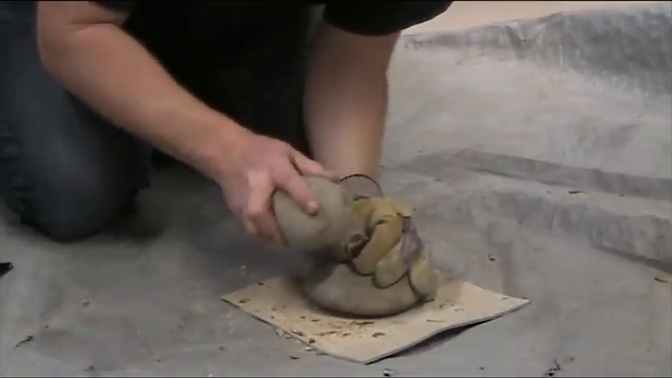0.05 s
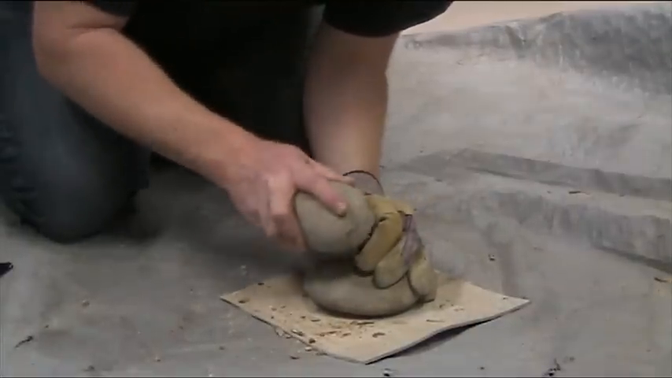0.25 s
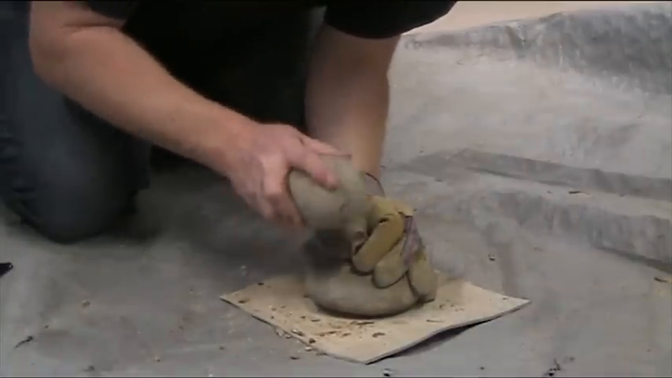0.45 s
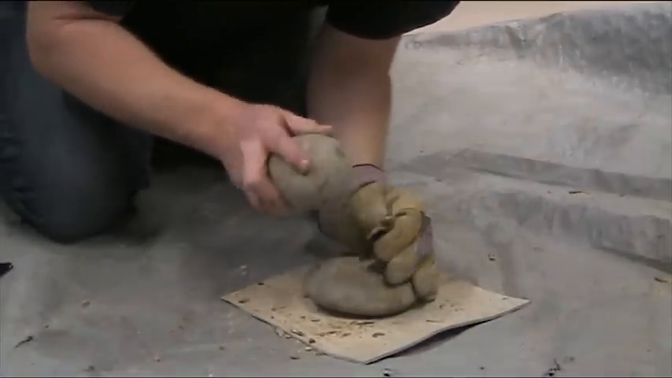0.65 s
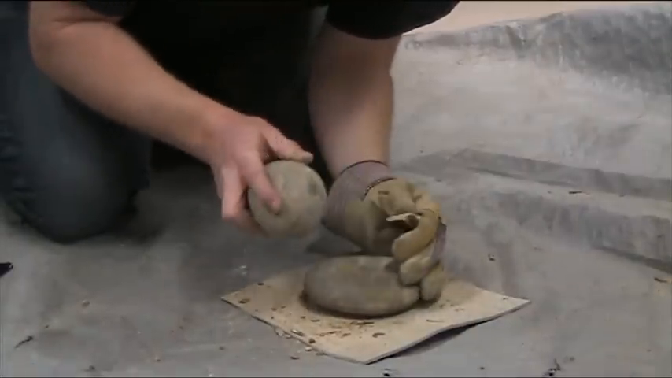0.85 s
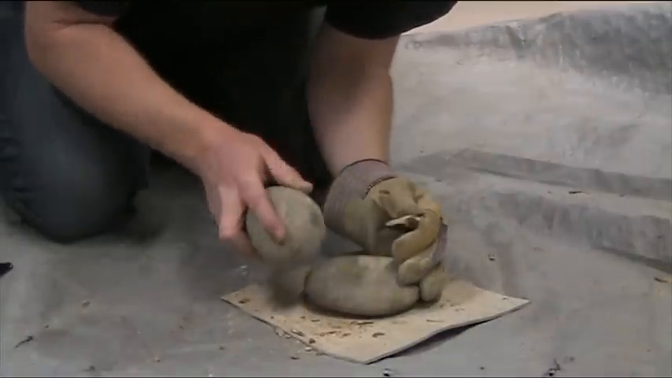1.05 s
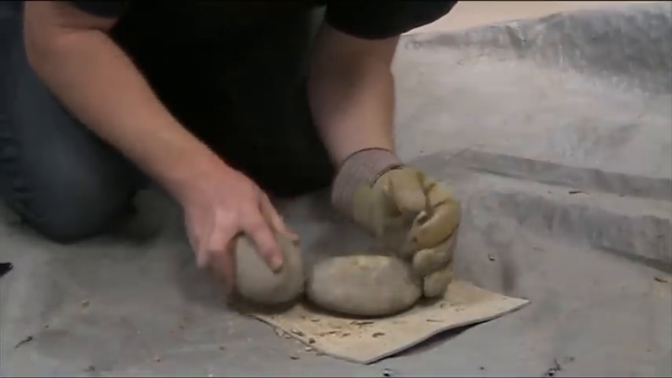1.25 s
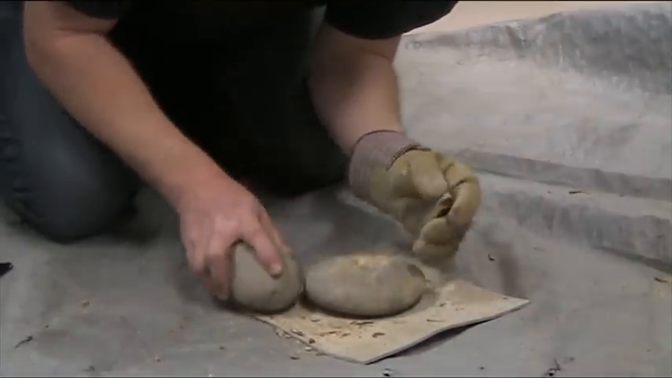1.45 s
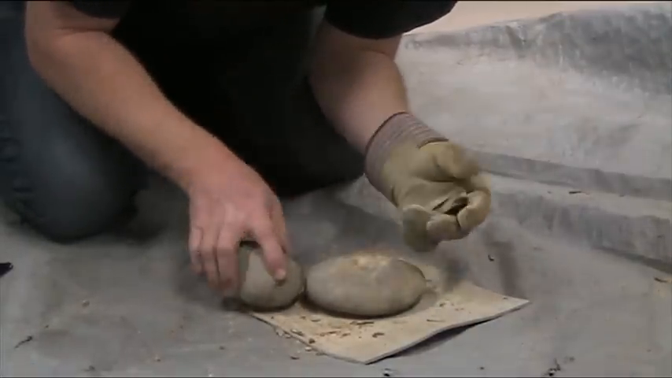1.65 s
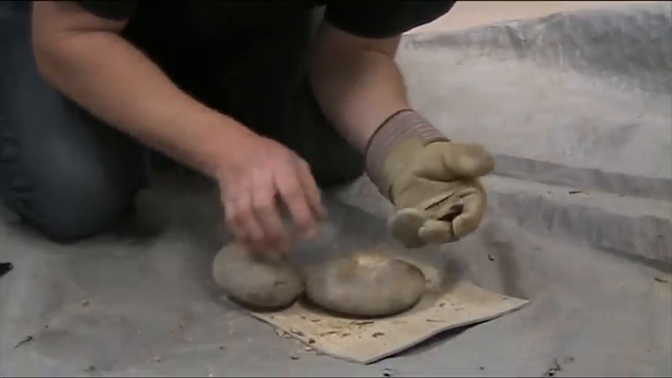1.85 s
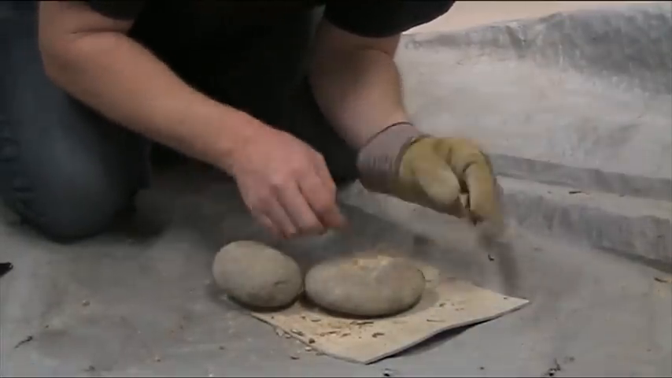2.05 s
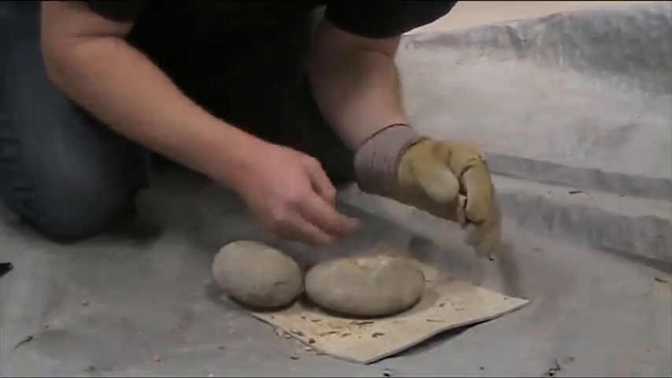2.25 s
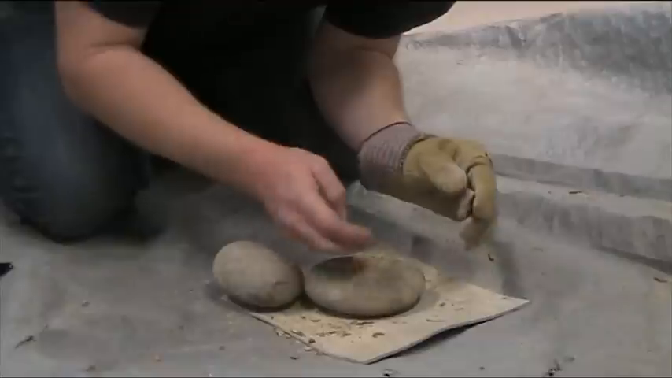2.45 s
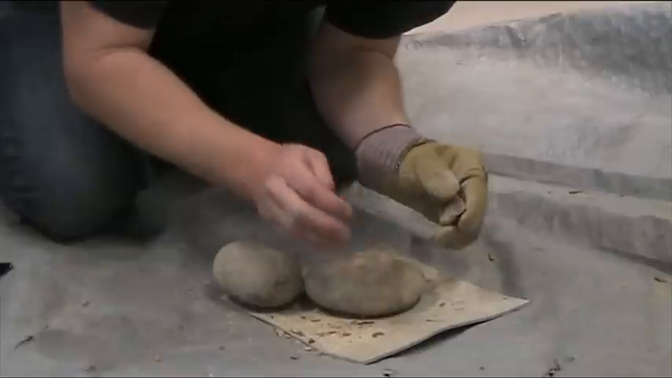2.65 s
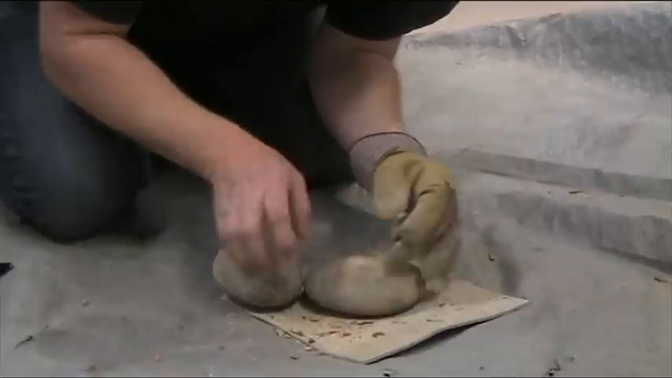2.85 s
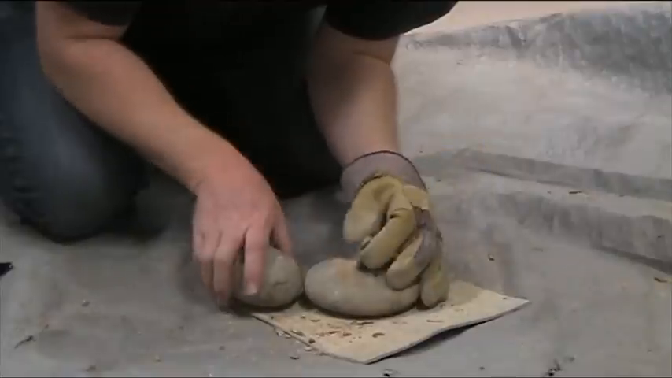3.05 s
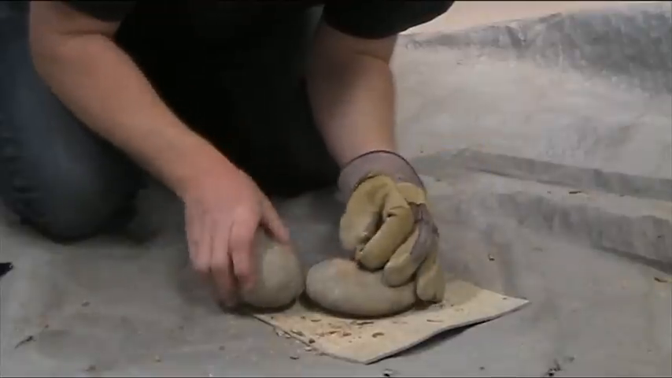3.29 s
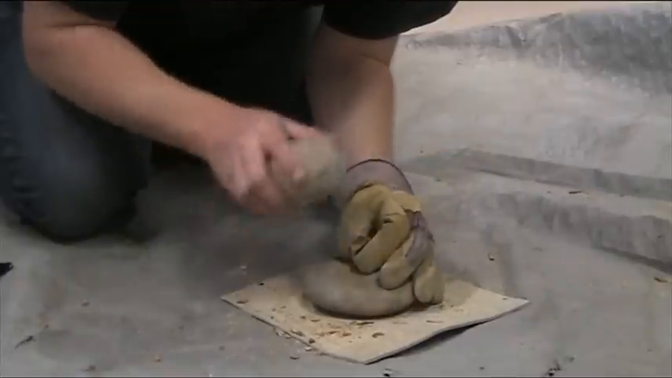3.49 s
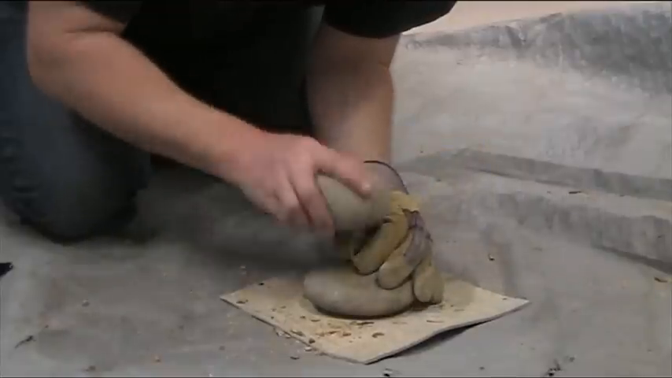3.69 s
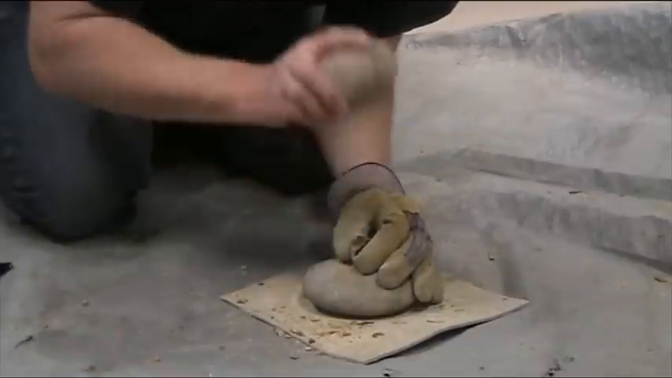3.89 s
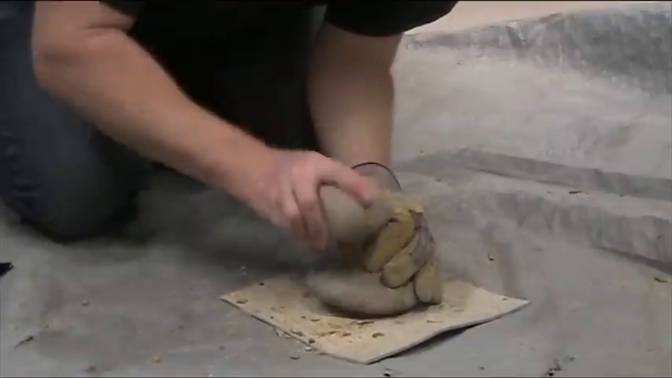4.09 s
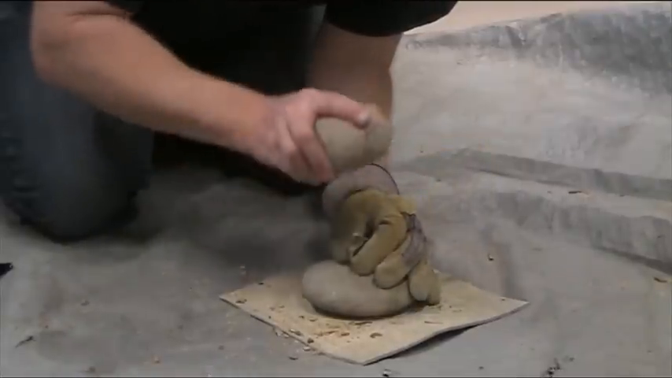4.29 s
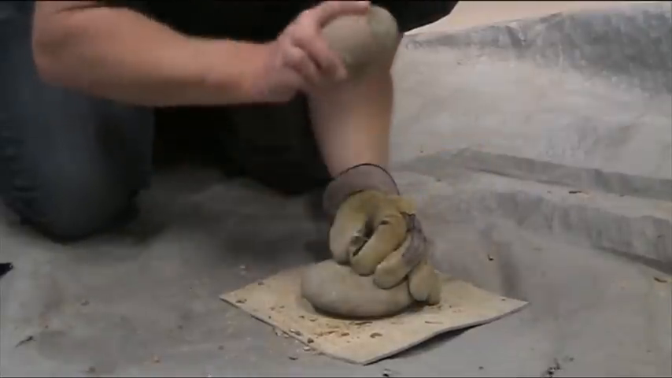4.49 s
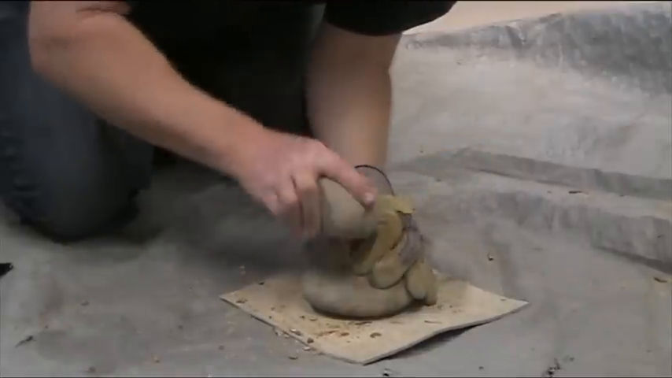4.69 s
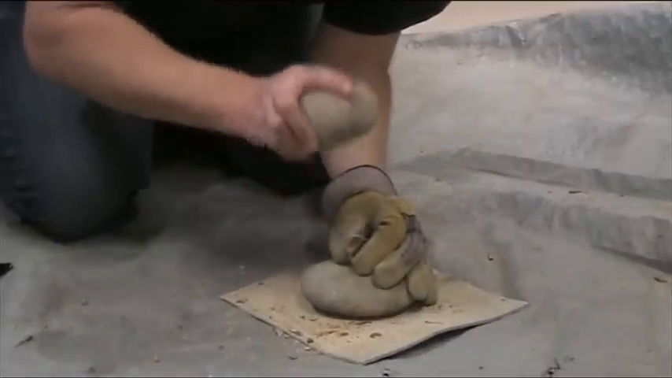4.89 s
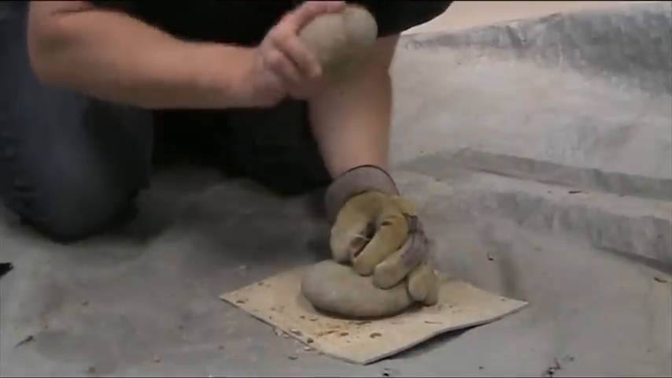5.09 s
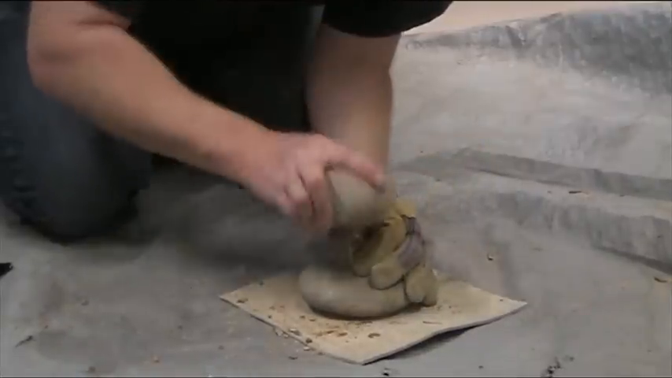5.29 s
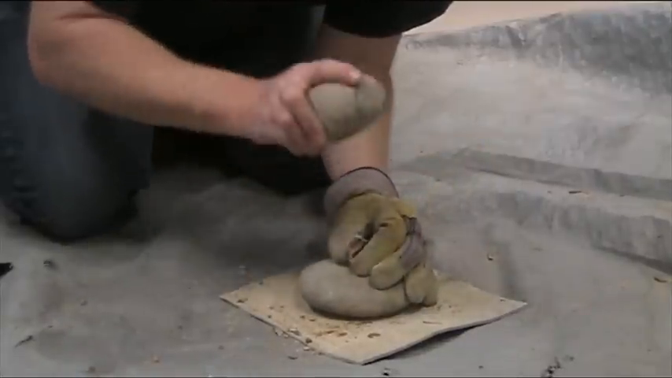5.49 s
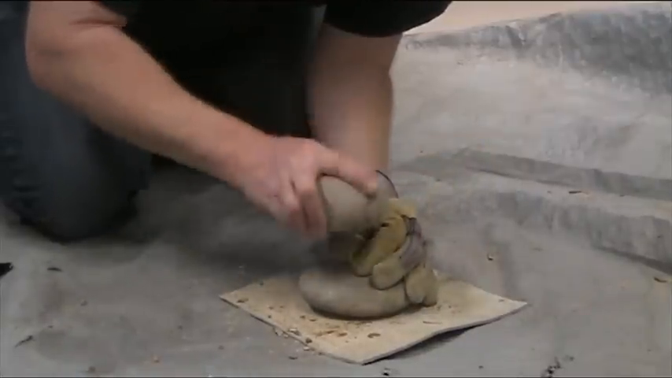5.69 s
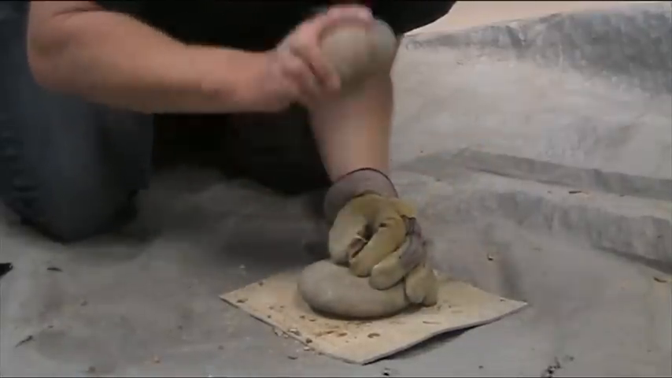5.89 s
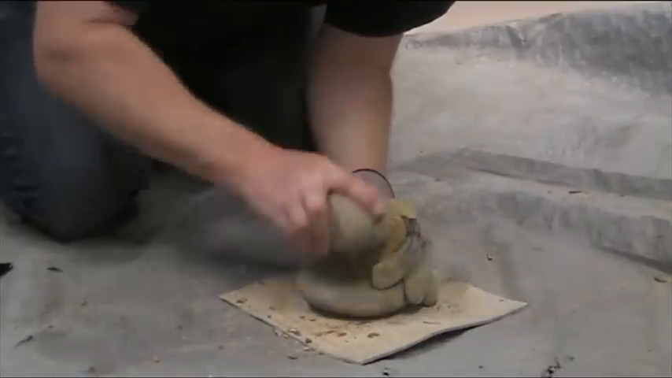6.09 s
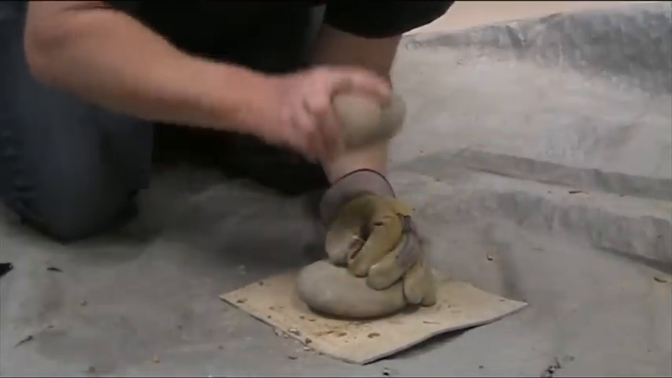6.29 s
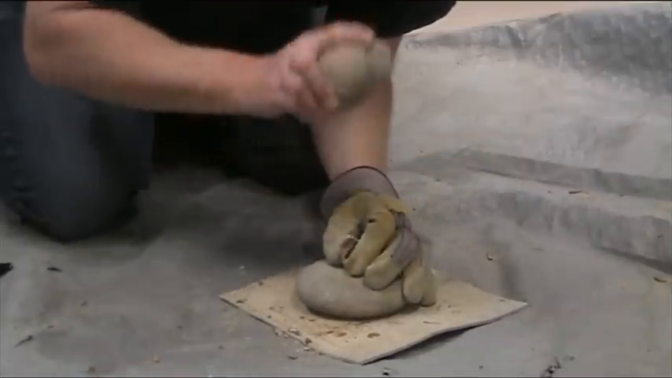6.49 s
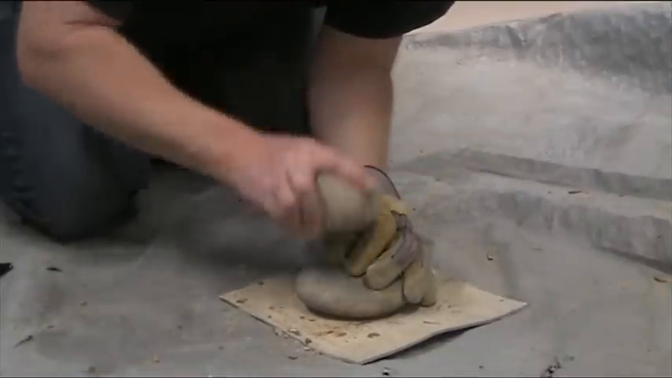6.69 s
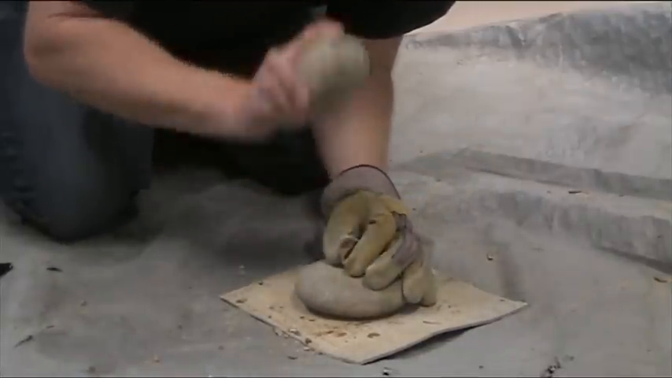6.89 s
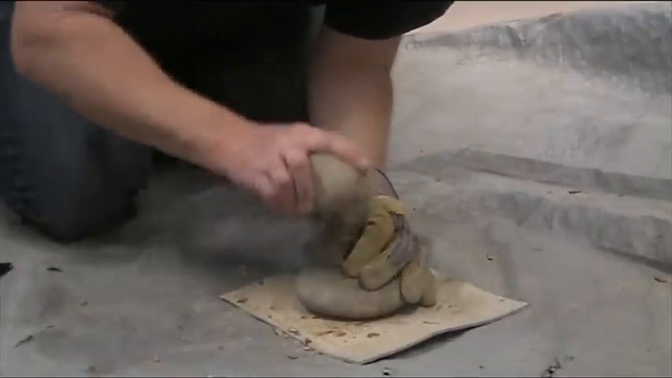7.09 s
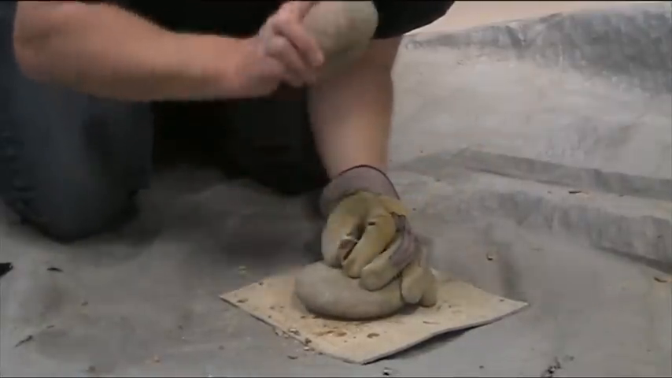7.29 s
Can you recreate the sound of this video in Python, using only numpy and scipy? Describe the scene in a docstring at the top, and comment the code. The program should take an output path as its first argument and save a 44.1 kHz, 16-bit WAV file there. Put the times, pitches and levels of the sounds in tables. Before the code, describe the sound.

A quiet, echoing workshop with a low, wide room background. From 0 to 1 s, soft stone bumps, faint grit scraping and the rustle of clothes and a leather glove. Around 1.3 to 1.8 s the hammerstone is set down with small clicks; chips are brushed away with light ticks, and at 2.3 s the floor booms softly. From 2.5 to 3.5 s little taps, bumps and gritty drags reseat the core, then it is nearly still. Five very loud stone-on-flint blows follow at about 4.1, 4.6, 5.2, 6.05 and 7.0 s: sharp cracks with short, mid-pitched clacking resonance, little bass, slightly overloaded, each with an echo fading in about half a second. Light aiming taps and scratches sit between them, with a brighter gritty scrape near 6.7 s and a faint patter of chips clearest after the third blow.

```python
"""A reverberant workshop, where a flint core is split on a stone anvil that lies on a tarpaulin.
The hammerstone is put down, chips are picked off and the core is reseated; then come five hard blows,
with light aiming taps and scattering grit between them. Damped modes make the knocks, noise bursts the
cracks and taps, showers of grains the grit, and coloured noise the rustle, the echo and the room background.
The recorder's gain control ducks each blow and its peaks overload."""
import sys
import numpy as np
from scipy import signal
from scipy.fft import rfft, irfft
from scipy.io import wavfile
from scipy.ndimage import uniform_filter1d

SR = 44100
rng = np.random.default_rng(int(sys.argv[2]) if len(sys.argv) > 2 else 0)


def pcm_store(signal):
    """Save signal as 16-bit PCM."""
    levels = np.round(np.clip(np.atleast_2d(signal), -1, 1) * 32767)
    wavfile.write(sys.argv[1], SR, levels.astype(np.int16).T)


N = 323694
TIME = np.arange(N) / SR


def from_db(db):
    """Decibels to gain."""
    return 10 ** (np.asarray(db) / 20)


def rms_one(x):
    """Scale to unit power."""
    return x / np.sqrt(np.mean(x ** 2) + 1e-20)


def at_hz(points, hz, axis=1):
    """Read one column of a table on a log-frequency axis."""
    table = np.array(points)
    return np.interp(np.log(np.maximum(hz, 1)), np.log(table[:, 0]), table[:, axis])


def band(x, low_hz, high_hz, order=2):
    """Causal band-pass."""
    edges_hz = [low_hz, min(high_hz, SR / 2 - 500)]
    return signal.sosfilt(signal.butter(order, edges_hz, "band", fs=SR, output="sos"), x + 1e-18)


def add(track, s, sound):
    """Mix a sound into a track from time s on."""
    start = max(int(s * SR), 0)
    track[start:start + len(sound)] += sound[:N - start]


# hard blows of the hammerstone: t/s, knock level/dB, then levels relative to the knock:
# body level/dB, clack level/dB, low ring level/dB, high ring level/dB, floor thud level/dB;
# crack top f/Hz, falling chips level/dB (not relative to the knock)
HARD_BLOWS = [(4.0794, 4.7, 3, 1, -8.5, -4, -26.5, 11700, -42),
              (4.6315, 7.8, 0, -14, -2.5, 1, -32, 7800, -71),
              (5.2204, 6.2, 2.5, -4, -8, -6, -32, 10400, -29.5),
              (6.0504, 5.4, 4, -11, -3, 6.5, -30, 8800, -53.5),
              (6.971, 8.1, 1, -1.5, -7, -5, -25.5, 6500, -49)]
# gentle bumps as the stones are moved and seated: t/s, knock level/dB, then relative to the knock:
# body level/dB, clack level/dB, low ring level/dB, high ring level/dB
GENTLE_BUMPS = [(0.03, -28.5, 5, -16, 4, 3), (0.039, -26, 3, -13, 1, -1), (0.1478, -34, -8, 7, 17, 8),
                (2.5100, -31, 5, 1.5, -10, 3), (3.052, -33.5, -15, -1, 14, 21),
                (4.5810, -25.5, -12, -2, 10, 10.5), (6.4770, -34.5, -10, 8.5, 5, -10)]
CRACK_DB = -8.5   # crack of the flint against the knock


def blows(crack_s=.0027, crack_low_hz=2100, thud_hz=75, thud_s=.007):
    """A hard blow knocks, cracks the flint and thuds through the anvil into the floor; a bump only knocks."""
    t = TIME[:SR // 10]
    thud = np.sin(2 * np.pi * thud_hz * t) * np.exp(-t / thud_s)
    knocks = np.zeros(N)
    for s, knock_db, *place_db, thud_db, crack_top_hz, _ in HARD_BLOWS:
        knock_and_thud = knock(*place_db) + from_db(thud_db) * thud
        add(knocks, s, from_db(knock_db) * knock_and_thud)
        crack = band(crackle(crack_s), crack_low_hz, crack_top_hz, order=1)
        add(knocks, s, from_db(knock_db + CRACK_DB) * crack)
    for s, knock_db, *place_db in GENTLE_BUMPS:
        add(knocks, s, from_db(knock_db) * knock(*place_db))
    # knocks, cracks and thuds have little deep bass
    return band(knocks, 55, 20000)


# middles of the body, knock, clack, low ring and high ring ranges: f/Hz
RING_RANGES = [450, 1100, 1750, 2500, 3700]
# modes of hammerstone, core and anvil pressed together: f/Hz, least width/Hz, level/dB
STONE_RESONANCES = [(152, 118, -24), (283, 177, -14.5), (492, 192, -14), (877, 194, -8), (965, 93.6, -8.5),
                    (1208, 141, -1.5), (1471, 163, -0.5), (1657, 129, 0), (1933, 262, 2.5), (2237, 59, 0.5),
                    (2712, 950, 9), (3170, 1380, 9), (3590, 290, -4), (4270, 1500, -33.5), (4740, 520, -72)]
HIGHEST_Q = 11   # hand and glove let no mode ring more sharply than this


def knock(body_db, clack_db, low_ring_db, high_ring_db, crush_s=0.0014, crush_gain=.018):
    """Damped stones ring as flint is crushed at the contact; where they meet decides which ranges ring."""
    t = TIME[:SR // 10]
    ranges_db = [body_db, 0, clack_db, low_ring_db, high_ring_db]
    stones = 0
    for k, (hz, width, mode_db) in enumerate(STONE_RESONANCES):
        place_db = np.interp(np.log(hz), np.log(RING_RANGES), ranges_db)
        decay = np.exp(-np.pi * max(width, hz / HIGHEST_Q) * t)
        ring = decay * np.cos(2 * np.pi * hz * t)
        # neighbouring modes start in opposite phase
        stones = stones + (-1) ** k * from_db(mode_db + place_db) * ring
    force = crush_gain * crackle(crush_s)
    force[0] = 1   # the first hit, ahead of the crushing
    return signal.fftconvolve(stones, force)[:len(t)]


def crackle(decay_s, order=6, count=25, size=2048):
    """A brief burst, about twice decay_s long, of near-even spectrum; a high order ends it abruptly."""
    gate = np.exp(-(TIME[:size] / max(2 * decay_s, 4e-4)) ** order)
    burst = rng.standard_normal(size) * gate
    for _ in range(count):
        # flatten the spectrum, then confine the burst to its gate again
        phase = np.angle(rfft(burst))
        burst = irfft(np.exp(1j * phase), size) * gate
    return burst * np.linalg.norm(gate) / np.linalg.norm(burst)


# light contacts on the flint: t/s, click level/dB, tilt towards the treble/dB, chip pitch f/Hz
LIGHT_TAPS = [(0.3096, -41, 3, 3240), (1.3239, -33.5, 4, 2340), (1.5608, -37, 10, 10000),
              (1.6853, -41.5, 0, 1210), (1.8063, -47, 11, 3980), (2.5646, -41.5, 14, 4020),
              (2.6254, -39.5, -1.5, 3450), (2.937, -35, -2, 3950), (3.024, -33.5, -9, 3800),
              (3.0511, -29, 3, 1430), (3.512, -36, -1.5, 3930), (3.716, -46.5, 6.5, 2280),
              (4.36, -28.5, -1, 1940), (4.582, -35, -4, 1480), (5.5376, -27, -5.5, 3340),
              (5.8557, -31, 5.5, 7100), (6.4638, -38, 9.5, 1490), (6.5887, -31.5, 2.5, 4200),
              (6.7049, -38.5, -8.5, 2280), (6.7269, -29, 12, 8360), (6.9003, -40.5, -10.5, 2060)]
TAP_DECAY_S, TAP_EDGES_DB = .0017, -5   # crackle setting; dull and bright ranges against the middle
CHIP_RING_DB, CHIP_RING_HZ = 10, 2980   # a chip's ring against its click, at a typical pitch


def taps(ring_cycles=2.2):
    """A contact crackles for a few ms; the flint touched rings briefly, with equal energy at any pitch."""
    t = TIME[:SR // 20]
    forces, rings = np.zeros((3, N)), np.zeros(N)
    for s, click_db, tilt_db, chip_hz in LIGHT_TAPS:
        for force, gain in zip(forces, tilted(click_db, tilt_db, TAP_EDGES_DB)):
            add(force, s, gain * crackle(TAP_DECAY_S, order=2))
        decay = np.exp(-t * chip_hz / ring_cycles)
        ring = np.sqrt(chip_hz / CHIP_RING_HZ) * np.sin(2 * np.pi * chip_hz * t) * decay
        add(rings, s, from_db(click_db + CHIP_RING_DB) * ring)
    return grit_colour(forces) + rings


# grit dragged under stone and glove, and a few sharp showers of chips: t/s, swell/s, decay/s, level/dB, tilt
# towards the treble/dB
GRIT_SCRAPES = [(0.001, .002, 0.16, -48, -0.5), (0.516, 0.023, 0.0059, -48.5, -3),
                (0.57, 0.03, 0.045, -50, 3), (0.725, 0.023, .016, -53.5, 11.5),
                (0.823, 0.0045, 0.036, -51, 6), (0.92, .014, 0.014, -53, 3), (1.245, 0.017, .03, -59, -5),
                (1.313, 0.0028, 0.011, -41.5, 1), (1.45, 0.016, .08, -56, 5.5),
                (2.03, .01, 0.14, -64.5, -9), (2.319, 0.041, 0.0061, -52.5, 13),
                (2.63, 0.037, .03, -58, -6), (2.804, 0.019, 0.0093, -49, -1.5),
                (3.03, 0.027, 0.016, -45.5, 2), (3.20, 0.051, 0.026, -46, -1.5),
                (3.42, 0.025, 0.05, -54.5, 1.5), (5.09, .017, 0.062, -52.5, 4.5),
                (5.849, 0.0037, 0.013, -44.5, 6), (6.723, 0.0048, 0.023, -31.5, 3),
                (6.923, .004, 0.017, -37, 1.5)]
# chips thrown off by a blow fly for a moment, then patter down on the tarpaulin
CHIP_FLIGHT_S, CHIP_SWELL_S, CHIP_DECAY_S, CHIP_TILT_DB = 0.2186, 0.0067, 0.037, 7.5


def scrapes(per_s=9000, spread_db=2.5):
    """Showers of grains that swell and die away: grit being dragged, a few chips scattering, and chips landing
    after each blow."""
    t = TIME[:SR // 2]
    landings = [(s + CHIP_FLIGHT_S, CHIP_SWELL_S, CHIP_DECAY_S, chips_db, CHIP_TILT_DB)
                for s, *_, chips_db in HARD_BLOWS]
    envelopes = np.zeros((3, N))
    for s, swell_s, decay_s, level_db, tilt_db in list(GRIT_SCRAPES) + landings:
        shape = np.minimum(t / swell_s, 1) * np.exp(-np.maximum(t - swell_s, 0) / decay_s)
        for envelope, gain in zip(envelopes, tilted(level_db, tilt_db)):
            add(envelope, s, gain * shape)
    return grit_colour([envelope * grains(per_s, spread_db) for envelope in envelopes])


def grains(per_s, spread_db):
    """Random micro-fractures of very uneven size; rms 1."""
    sizes = from_db(spread_db * np.minimum(rng.exponential(1, N), 4))
    signs = rng.choice([-1, 1], N)
    happens = rng.random(N) < per_s / SR
    return rms_one(sizes * signs * happens)


def tilted(db, tilt_db, edges_db=0):
    """Gains of the dull, middle and bright ranges of a small contact."""
    return from_db(db + np.array([edges_db - tilt_db, 0, edges_db + tilt_db]))


# edges of the dull, middle and bright ranges of small contacts: f/Hz
GRIT_EDGES = [1100, 2500, 5800, 13000]


def grit_colour(forces):
    """Three force tracks excite the dull, middle and bright ranges, each keeping its power."""
    coloured = 0
    for force, low, high in zip(forces, GRIT_EDGES, GRIT_EDGES[1:]):
        coloured = coloured + band(force, low, high) * np.sqrt(SR / 2 / (high - low))
    return coloured


# how briskly arms and glove move, before the cloth and crumb gains: t/s, level/dB
MOTION = [(0.0, -38), (0.09, -37.5), (0.34, -51.5), (0.81, -48), (0.97, -64), (1.29, -70), (1.45, -52.5),
          (1.89, -49.5), (2.37, -53.5), (2.97, -48), (3.1, -42), (3.8, -74)]
# colour of the cloth noise: f/Hz, relative level per Hz/dB
CLOTH_COLOUR = [(290, -33), (500, 6), (750, 3.5), (2070, 0), (3490, 4), (3750, -3), (5800, 1.5),
                (16000, -33.5)]
# side against mid of cloth and room background: f/Hz, level/dB
BACKGROUND_WIDTH = [(60, 2), (110, 3), (200, 5), (380, 6), (700, 4), (1290, 1), (2380, 0), (4400, -2),
                    (8120, -3), (15000, -1)]
# resonances of the floor: f/Hz, width/Hz, level/dB
FLOOR_RESONANCES = [(64, 43, -6), (124, 8, -7.5), (273.6, 10, -12)]
EVEN_RUSTLE_S, EVEN_RUSTLE_DB = 4.7, -44   # from here on the rustle keeps one level
# the floor booms once as the kneeling weight shifts
SHIFT_S, SHIFT_DB, SHIFT_RISE_DB_PER_S, SHIFT_FALL_DB_PER_S = 2.29, -46, 90, 30


def handling(cloth_db=-4, crumbs_db=-17):
    """Cloth rustles and crumbs tick on the tarpaulin as the arms move; the floor booms as weight shifts."""
    moving_db = np.interp(TIME, *np.transpose(MOTION))
    motion = from_db(np.where(TIME < EVEN_RUSTLE_S, moving_db, EVEN_RUSTLE_DB))
    cloth = from_db(cloth_db) * rms_one(diffuse(CLOTH_COLOUR, N, BACKGROUND_WIDTH))
    crumbs = rms_one(band(grains(per_s=300, spread_db=4.5), 2000, 11000, order=1))
    boom = 0
    for hz, width, db in FLOOR_RESONANCES:
        rumble = band(rng.standard_normal(N), hz - width / 2, hz + width / 2, order=1)
        boom = boom + rms_one(rumble) * from_db(db)
    rise_db = (SHIFT_S - TIME) * SHIFT_RISE_DB_PER_S
    fall_db = (TIME - SHIFT_S) * SHIFT_FALL_DB_PER_S
    shift_db = SHIFT_DB - np.maximum(rise_db, fall_db)
    return motion * (cloth + from_db(crumbs_db) * crumbs) + from_db(shift_db) * boom


def diffuse(spectrum, size, width):
    """Stereo noise of a given colour and width."""
    hz = np.arange(size // 2 + 1) * SR / size
    mid, side = rfft(rng.standard_normal((2, size))) * from_db(at_hz(spectrum, hz))
    side = side * from_db(at_hz(width, hz))
    return irfft(np.array([mid + side, mid - side]), size)


# the workshop's echo: f/Hz, level/dB, t60/s
ECHO = [(49.6, -8, 2.2), (127, -1, 0.29), (270, 0.5, 0.82), (590, 4.5, 0.64), (1140, 0.5, 0.64),
        (3220, -1, 0.66), (8000, -5.5, 0.49), (10800, -14.5, 0.69), (15900, -12.5, 0.19)]
# standing waves between the walls: f/Hz, level/dB, t60/s
STANDING_WAVES = [(58.1, -73, 2.1), (152.3, -49.5, 0.75), (212, -46.5, 0.52), (269.8, -51, 0.4),
                  (556.6, -54, 0.88)]
# side against mid of the echo: f/Hz, level/dB
ECHO_WIDTH = [(50, -6), (150, -11), (450, -15), (1300, -10), (2500, -6), (5000, -3), (14000, 0)]


def workshop(dry, early_db=-4, early_t60=0.11, late_db=0, first_echo_s=0.0018, build_s=0.0062):
    """Near reflections, then a diffuse tail dying band by band, with standing waves at low pitches."""
    t = TIME[:SR * 3 // 2]
    hz = np.arange(len(t) // 2 + 1) * SR / len(t)
    noise = rfft(diffuse(ECHO, len(t), ECHO_WIDTH))
    arrived = np.maximum(t - first_echo_s, 0)
    early = from_db(-60 * t / early_t60) * (arrived > 0)
    early = from_db(early_db) * early / np.linalg.norm(early)
    centres = np.geomspace(50, 16000, 12)
    response = 0
    # overlapping bands crossfade between neighbouring centres
    for centre, share in zip(centres, np.eye(len(centres))):
        late = from_db(-60 * t / at_hz(ECHO, centre, axis=2)) * (1 - np.exp(-arrived / build_s))
        late = from_db(late_db) * late / np.linalg.norm(late)
        part = irfft(noise * at_hz(np.column_stack([centres, share]), hz), len(t))
        response = response + part * (early + late)
    for mode_hz, mode_db, t60 in STANDING_WAVES:
        response = response + from_db(mode_db - 60 * t / t60) * np.sin(2 * np.pi * mode_hz * t)
    return signal.fftconvolve(dry[None], response, axes=1)[:, :N]


# colour of the room background: f/Hz, relative level per Hz/dB
AIR_COLOUR = [(15, -14), (25, -51), (43, -3), (102, -9), (137, -3), (223, -13.5), (242, -7.5), (373, -10.5),
              (405, -11.5), (754, -15), (962, -16), (2760, -21), (12200, -31.5), (16000, -38)]


def room_air(level_db=-48.5):
    """The room's steady background: wide coloured noise."""
    return from_db(level_db) * rms_one(diffuse(AIR_COLOUR, N, BACKGROUND_WIDTH))


def scene(direct_db=-1.0, right_lag_s=1.2e-5):
    """The stones lie almost straight ahead; their sound reaches the right capsule a moment later."""
    stones = blows() + taps() + scrapes()
    hz = np.arange(N // 2 + 1) * SR / N
    right = irfft(rfft(stones) * np.exp(-2j * np.pi * hz * right_lag_s), N)
    direct = from_db(direct_db) * np.array([stones, right])
    return direct + workshop(stones) + handling() + room_air()


def gain_control(x, threshold_db, slope, attack_s, release_db_per_s):
    """Turns loud sound down within milliseconds, then lets the gain recover at a steady rate in dB."""
    power = uniform_filter1d(np.mean(x ** 2, axis=0), size=256, origin=127)
    level_db = 10 * np.log10(np.maximum(power, 1e-12))
    excess = min(slope, 1) * np.maximum(level_db - threshold_db, 0)
    # hold each peak of gain reduction and let it fall in a straight line
    held = np.maximum.accumulate(excess + release_db_per_s * TIME) - release_db_per_s * TIME
    pole = np.exp(-1 / (attack_s * SR))
    return x * from_db(-signal.lfilter([1 - pole], [1, -pole], held))


def record(dry):
    """Gain control, soft overload of the peaks that it lets through, and the top cut."""
    x = gain_control(dry, threshold_db=-12, slope=0.79, attack_s=0.0094, release_db_per_s=78)
    clipped = x / (1 + (x / .86) ** 6) ** (1 / 6)
    top_cut = signal.ellip(10, .1, 80, 16000, fs=SR, output="sos")   # low-pass at 16 kHz
    return signal.sosfilt(top_cut, clipped)


dry = scene()
out = record(dry)
pcm_store(out)
```